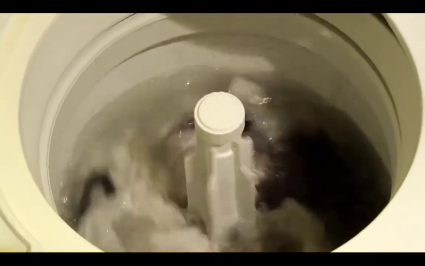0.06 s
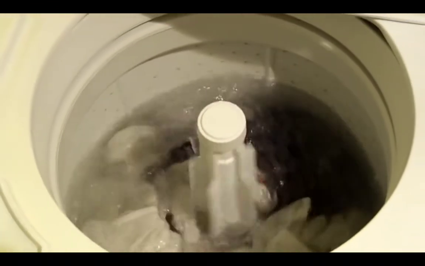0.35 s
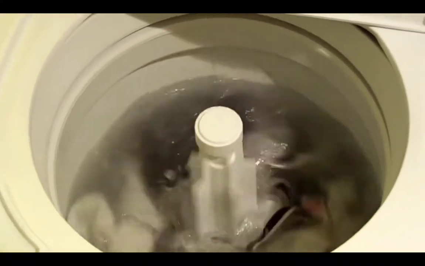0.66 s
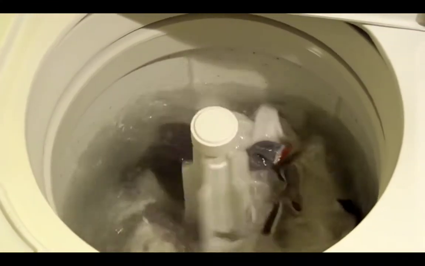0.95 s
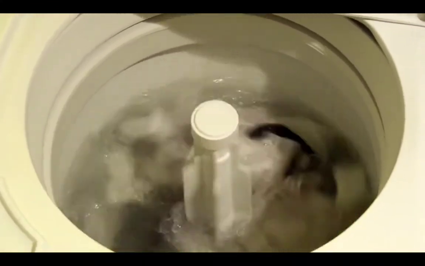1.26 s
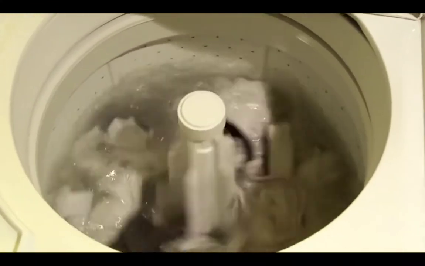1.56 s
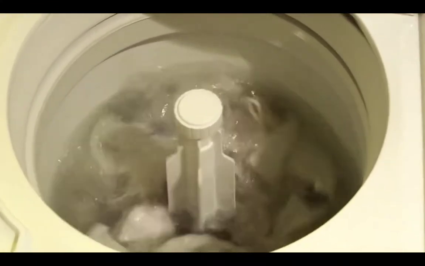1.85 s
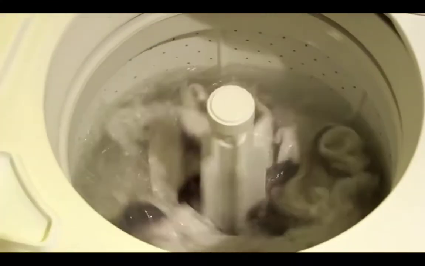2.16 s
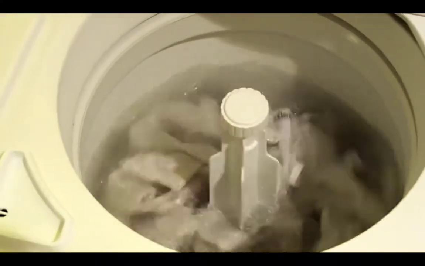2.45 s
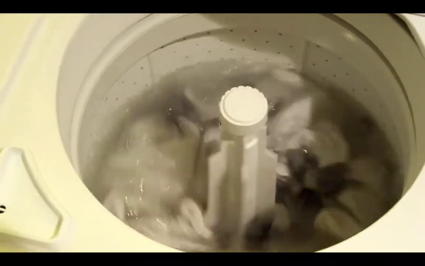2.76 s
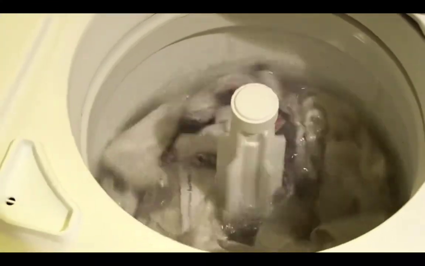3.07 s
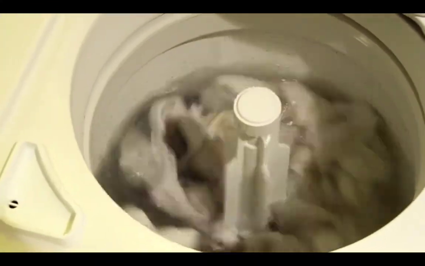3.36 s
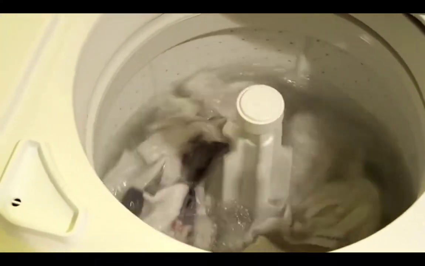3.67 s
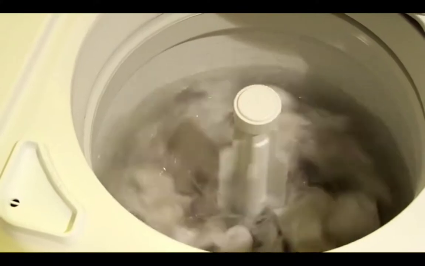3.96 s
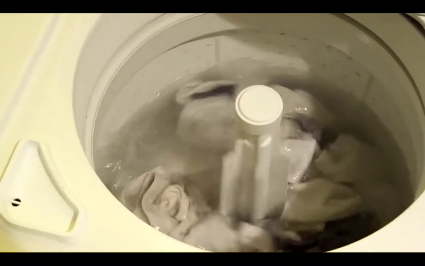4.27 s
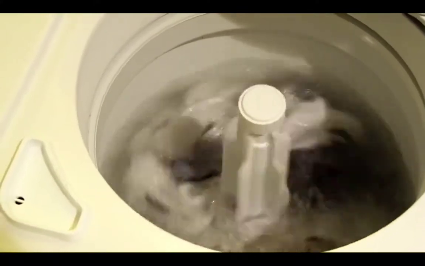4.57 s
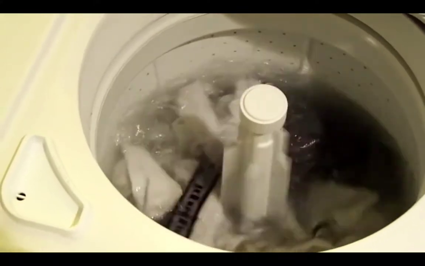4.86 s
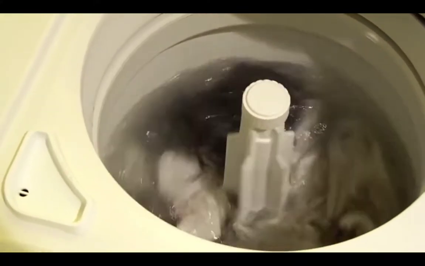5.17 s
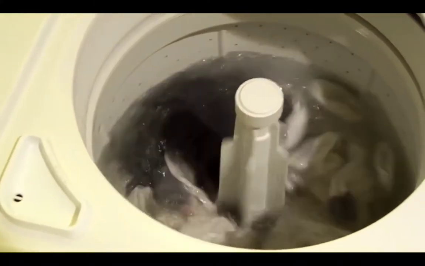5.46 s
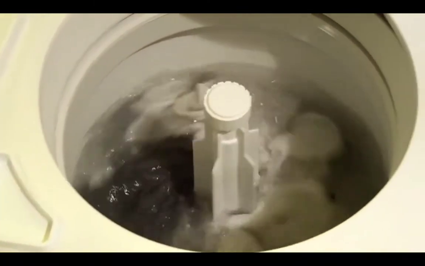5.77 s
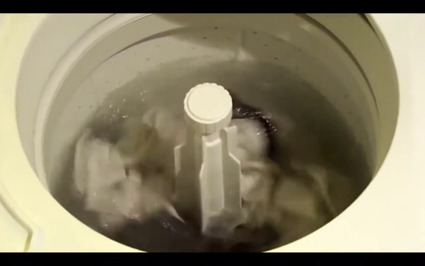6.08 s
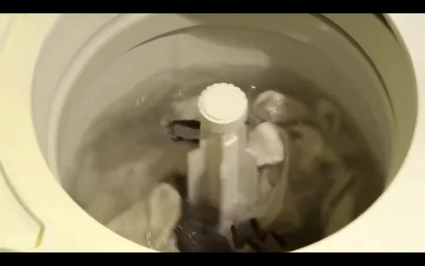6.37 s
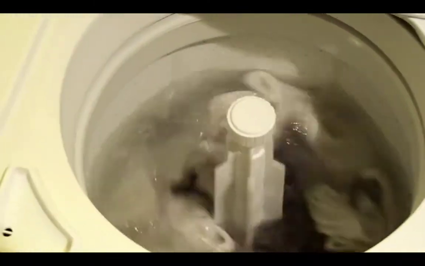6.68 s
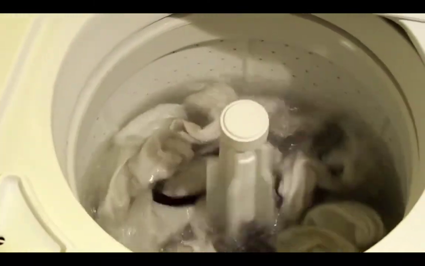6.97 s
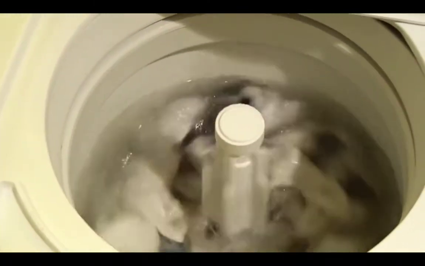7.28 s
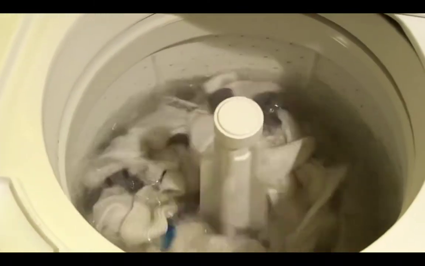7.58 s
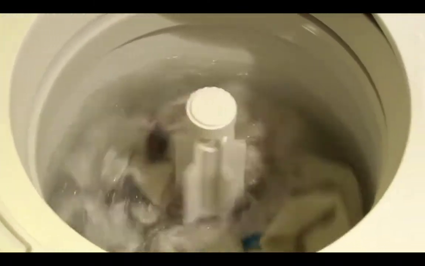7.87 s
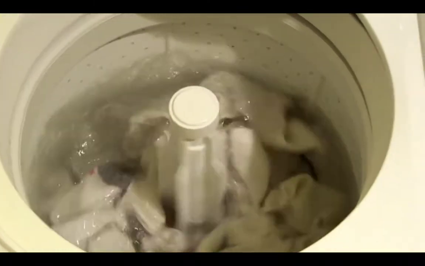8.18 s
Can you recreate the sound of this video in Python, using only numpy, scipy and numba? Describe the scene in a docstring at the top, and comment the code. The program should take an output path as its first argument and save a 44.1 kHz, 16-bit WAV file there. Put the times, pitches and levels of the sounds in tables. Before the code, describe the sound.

Rhythmic sloshing and splashing of laundry in a top-loading washer, with a humming, rumbling motor underneath.

```python
"""Water sloshes in steady strokes over a motor hum: a top-loading washer, heard from just above the open tub.
Each stroke of the agitator drags cloth through the water: a bubbling surge, a backwash, a fizz of spray.
Wet cloth slaps the surface, single drops ring as trapped bubbles, and the load knocks dully on the tub.
Underneath, the cabinet rumbles and the gearbox whines, its pitch sagging twice in every stroke."""
import sys
import numpy as np
from scipy import signal
from scipy.fft import rfft, irfft
from scipy.io import wavfile
from scipy.ndimage import uniform_filter1d
from numba import njit

SR = 44100
rng = np.random.default_rng(int(sys.argv[2]) if len(sys.argv) > 2 else 0)


def transcribe(signal):
    """Save signal, clipped to [-1, 1], as a 16-bit WAV file at the path in sys.argv[1]."""
    frames = np.atleast_2d(signal).T
    limited = np.clip(frames, -1, 1)
    pcm = np.round(limited * 32767).astype(np.int16)
    wavfile.write(sys.argv[1], SR, pcm)


N = 367353
STROKE_S = .5515  # the beat of the agitator


def undb(db):
    """Decibels to gain."""
    return 10 ** (np.asarray(db) / 20)


def unit(x):
    """Scale to rms 1."""
    return x / np.sqrt(np.mean(x ** 2))


def envelope(points):
    """Straight ramps through (time_s, value) points, one value a sample."""
    return np.interp(np.arange(N) / SR, *np.transpose(points))


def eq_curve(points):
    """Gain at every frequency from (freq_hz, gain_db) points."""
    hz, db = np.transpose(points)
    bin_hz = np.arange(N // 2 + 1) * SR / N
    return undb(np.interp(np.log(bin_hz + 1), np.log(hz), db))


def eq(x, points):
    """Filter with an EQ curve."""
    return irfft(rfft(x) * eq_curve(points), N)


def band(x, points):
    """EQ that falls steeply beyond its ends; rms 1."""
    return unit(eq(x, [(points[0][0] / 2, -60), *points, (points[-1][0] * 2, -60)]))


def noise():
    """Two unrelated noises, for mid and side."""
    return rng.standard_normal((2, N))


def drift(rate_hz):
    """A smooth random modulator: held steps, slewed twice; rms 1."""
    hold = max(int(SR / rate_hz), 1)
    steps = np.repeat(rng.standard_normal(N // hold + 1), hold)
    return unit(uniform_filter1d(uniform_filter1d(steps, hold), hold)[:N])


def tone(hz):
    """A sine of rms 1 on a moving pitch."""
    return np.sqrt(2) * np.sin(2 * np.pi * np.cumsum(hz) / SR)


def swell(centre_s, width_s):
    """A smooth bump of height 1."""
    return np.exp(-.5 * ((np.arange(N) / SR - centre_s) / width_s) ** 2)


def stroke_lfo(peak_s):
    """A cosine that peaks once a stroke."""
    return np.cos(2 * np.pi * (np.arange(N) / SR - peak_s) / STROKE_S)


def drum_reverb(dry, t60_s, wet_db):
    """The steel drum smears each sound with dense short echoes."""
    t = np.arange(SR // 4) / SR
    tails = rng.standard_normal((2, 2, len(t))) * undb(-60 * t / t60_s) * (t > .002)
    tails /= np.sqrt(np.sum(tails ** 2, axis=(1, 2), keepdims=True))
    echoes = signal.fftconvolve(dry[None], tails, axes=2).sum(axis=1)[:, :N]
    return (dry + undb(wet_db) * echoes) / np.hypot(1, undb(wet_db))


# tone colour of the cabinet rumble: freq_hz, gain_db
RUMBLE_EQ = [(20, -3), (60, 0), (100, -5), (270, -4.5), (490, 2.5), (680, -4.5), (950, -1), (1300, -10),
             (2000, -11.5), (3000, -25), (6500, -26.5), (8000, -38)]
# ringing cabinet panels: pitch_hz, bandwidth_hz, level_db
PANEL_MODES = [(124.4, 25, -23.5), (180.5, 36, -30.5), (361.2, 39, -27.5), (440, 63, -28),
               (848, 110, -31.5), (1042, 58, -33.5)]
def cabinet(rumble_db=-23, flicker_db=1):
    """The drive and the moving water shake the cabinet: a broad rumble and a few ringing panels."""
    bed = undb(rumble_db + flicker_db * drift(14)) * band(noise(), RUMBLE_EQ)
    for hz, width_hz, db in PANEL_MODES:
        b, a = signal.iirpeak(hz, hz / width_hz / 2, fs=SR)
        bed += undb(db) * unit(signal.lfilter(b, a, signal.lfilter(b, a, noise())))
    return bed


# drone of the belt and pulleys: pitch_hz, level_db
BELT_TONES = [(90, -36.5), (185, -35.5)]
def belt():
    """The belt and pulleys add faint steady tones."""
    return sum(undb(db) * tone(np.full(N, hz)) for hz, db in BELT_TONES)


# slow fader ride on the hum: time_s, level_db
HUM_RIDE = [(0, -19), (.17, -13), (.32, -24.5), (.7, -18), (1.1, -16.5), (2.0, -19), (3.2, -18),
            (4.1, -17.5), (4.9, -22.5), (5.4, -19.5), (5.9, -19), (6.4, -17.5), (7.1, -20), (7.55, -14.5),
            (8.33, -18)]
def motor(mains_hz=60, trim_db=-1.5, dip_delay_s=.035, dip_width_s=.038, rebound=.27, rebound_delay_s=.16):
    """The motor hums at twice the mains rate, ducking as each stroke takes up the load, then rebounding."""
    level_db = envelope(HUM_RIDE) + trim_db + .6 * drift(16)
    for start_s, *_, dip_db in AGITATOR_STROKES:
        level_db -= dip_db * swell(start_s + dip_delay_s, dip_width_s)
        level_db += dip_db * rebound * swell(start_s + rebound_delay_s, dip_width_s)
    pitch_hz = 2 * mains_hz + 2.002 * drift(14) + 6 * drift(90)  # slow waver, fast shudder
    return undb(level_db) * tone(pitch_hz)


# slow fader ride on the gear whine: time_s, level_db
WHINE_RIDE = [(0, -22.5), (.5, -24.5), (.9, -26.5), (1.15, -20.5), (1.65, -27), (2.0, -26.5), (2.7, -24.5),
              (3.3, -25.5), (3.95, -29), (4.2, -22.5), (5.2, -26.5), (6.3, -28), (7.0, -27), (7.35, -22),
              (8.33, -26)]
def gearbox(mesh_hz=433.7, octave_db=-27.5, sag=.02, flutter=.009, chatter=.012, wander_db=2, slack_db=4):
    """Gear teeth sing unevenly; the drive slows under load, and the octave fades at each reversal."""
    load = stroke_lfo(peak_s=.228) ** 4  # the even power makes two sags a stroke
    reversal = np.maximum(stroke_lfo(peak_s=.53), 0) ** 4
    pitch_hz = mesh_hz * (1 - sag * load + flutter * drift(45) + chatter * drift(160))
    whine = undb(envelope(WHINE_RIDE) + wander_db * drift(18)) * tone(pitch_hz)
    octave = undb(octave_db - slack_db * reversal + wander_db * drift(16)) * tone(2 * pitch_hz)
    return whine + octave


# resonances of the tub: pitch_hz, level_db, t60_s
TUB_MODES = [(212, 1, .12), (329, 1, 0.059), (640, 1, 0.073), (755, 4.5, 0.03), (906, 3, 0.061),
             (1260, -3, 0.022)]
# the load bumping the tub: start_s, level_db
KNOCK_CUES = [(1.2092, -3.5), (4.268, -16.5), (5.675, -10)]
def knocks(trim_db=-7):
    """The heavy load bumps the tub, whose modes the water damps quickly."""
    t = np.arange(SR // 4) / SR
    thud = sum((-1) ** k * undb(db - 60 * t / t60_s) * np.sin(2 * np.pi * hz * t)
               for k, (hz, db, t60_s) in enumerate(TUB_MODES))
    hits = np.zeros(N)
    for start_s, db in KNOCK_CUES:
        hits[int(start_s * SR)] = undb(db + trim_db)
    return signal.fftconvolve(hits, thud)[:N]


@njit
def bubble_pings(start_sample, hz, cycles, gains, glide):
    """Each bubble rings as a decaying, rising sine, with its own gain in mid and side."""
    out = np.zeros((2, N))
    for k in range(len(start_sample)):
        start, length = int(start_sample[k]), int(cycles[k] * SR / hz[k]) + 1
        fade = np.exp(-5.8 / length)  # 50 dB down by the end
        phase, level = 0., 1.
        for i in range(min(length, N - start)):
            phase += 2 * np.pi * hz[k] * (1 + glide * i / length) / SR
            level *= fade
            ping = level * np.sin(phase)
            out[0, start + i] += gains[k, 0] * ping
            out[1, start + i] += gains[k, 1] * ping
    return out


# plinks of single drops: start_s, level_db, pitch_hz
DROP_CUES = [(0.262, -20, 3500), (0.309, -16, 3740), (0.64, -10, 2590), (0.946, -15.5, 3780),
             (1.691, -15, 5660), (2.5656, -16, 5800), (3.1288, -21, 5900), (4.8209, -20, 3220),
             (5.0577, -17, 6080), (5.251, -9.5, 5930), (5.598, -12, 5760), (5.8775, -18, 6000),
             (6.1414, -12, 5900), (6.6204, -25, 5800)]
def drops(trim_db=1, cycles=50., glide=.044, spread=.74):
    """Each drop traps a bubble that rings briefly and rises in pitch as it nears the surface."""
    start_s, db, hz = np.transpose(DROP_CUES)
    gain = undb(db + trim_db)
    mid_side = np.column_stack([gain, gain * spread * rng.uniform(-1, 1, len(hz))])
    plinks = bubble_pings(start_s * SR, hz.copy(), np.full(len(hz), cycles), mid_side, glide)
    return drum_reverb(plinks, t60_s=.083, wet_db=-1.5)


# wet cloth slapping the surface: start_s, level_db, burst_offset_db
SPLAT_CUES = [(0.0503, -20.5, 15), (0.094, -9.5, 0), (0.3467, -13.5, -4), (0.641, -19.5, 4),
              (0.819, -9, -3), (1.142, -11, -2), (1.211, -6, -5), (1.2255, -25, 4), (1.7873, -5, -6),
              (1.8734, -11.5, -5), (2.285, -11, -2), (2.3354, -10, 5.5), (2.748, -8, 0), (2.94, -20, 9),
              (3.05, -14, 4), (3.394, -12, -11), (3.5623, -8, -6), (3.9428, -8.5, -2), (3.959, -6, 0),
              (3.9902, -5, -5), (4.4804, 3, -13), (4.4904, -2.5, -7), (5.062, -18, 11), (5.1094, -11, 5.5),
              (5.2978, -12, -19), (5.6, -11.5, 1), (5.6724, -16, -3), (6.1414, -11, -5), (6.342, -13, 9.5),
              (6.6747, -7.5, -4), (6.7604, -18, -9), (6.9217, -17, 5), (7.4819, -15, -3), (7.7965, -6, -3),
              (7.876, -14, -8), (7.9766, -14, -11)]
def splats(crack_db=-2, burst_db=-8, attack_s=.0011, crack_decay_s=.0018, burst_decay_s=.008):
    """Cloth lands with a wet crack, then the duller burst of the water that it throws aside."""
    t = np.arange(N) / SR
    crack, burst = np.zeros(N), np.zeros(N)
    for start_s, db, offset_db in SPLAT_CUES:
        i = int(start_s * SR)
        age = t[:min(SR // 10, N - i)]
        onset = undb(db) * (1 - np.exp(-age / attack_s))
        crack[i:i + len(age)] += onset * undb(crack_db) * np.exp(-age / crack_decay_s)
        burst[i:i + len(age)] += onset * undb(burst_db + offset_db) * np.exp(-age / burst_decay_s)
    slaps = crack * band(noise(), SPRAY_EQ) + burst * band(noise(), SLOSH_EQ)
    return drum_reverb(slaps, t60_s=.14, wet_db=-12)


def bubble_cloud(low_hz, high_hz, cycles, scatter_db, glide, count):
    """Bubbles of all sizes: many faint, a few loud, each from its own place in the tub."""
    when, pitch, life, loudness, place = rng.random((count, 5)).T
    hz = low_hz * (high_hz / low_hz) ** pitch
    gain = hz * undb(-scatter_db * np.log(.02 + .98 * loudness))
    mid_side = np.column_stack([gain, gain * np.sqrt(2) * np.cos(2 * np.pi * place)])
    return unit(bubble_pings(when * N, hz, cycles * (.5 + life), mid_side, glide))


# strokes of the agitator: start_s, length_s, drag_db, surge_delay_s, surge_db,
# backwash_delay_s, backwash_db, spray_offset_db, hum_dip_db
AGITATOR_STROKES = [(0.028, .37, -26.5, .075, -18, .245, -25.5, -0.5, 5),
                    (0.589, .26, -28, 0.061, -18, .235, -28.5, 0.5, 5),
                    (1.14, 0.27, -25, 0.082, -18, .205, -25, -2, 4),
                    (1.696, 0.24, -26, .045, -26, .18, -22.5, -0.5, 1),
                    (2.256, 0.28, -29, .092, -22.5, .21, -30.5, 1, 11),
                    (2.746, .345, -27.5, 0.11, -33.5, .202, -22.5, -0.5, 2),
                    (3.389, .26, -28.5, .058, -23, .208, -17.5, 0, 10),
                    (3.902, 0.31, -27, 0.042, -25, .24, -21.5, 1, 8),
                    (4.441, 0.28, -25.5, .055, -23, 0.3, -28.5, -1.5, 12),
                    (5.043, 0.25, -30, 0.079, -20.5, .20, -26.5, 1, 3.5),
                    (5.584, 0.26, -29, 0.033, -20, 0.17, -29, 1, 5),
                    (6.125, .26, -28, 0.1, -23, .218, -23.5, 0, 7),
                    (6.663, 0.28, -28, 0.099, -15.5, .272, -22.5, 0.5, 8),
                    (7.234, 0.26, -25, 0.098, -22.5, 0.28, -28.5, 0.5, 2),
                    (7.742, 0.28, -24.5, .066, -19, .13, -25, 0.5, 1)]
def agitation(calm_db, swing_db, crest_db, fade_db_per_s, attack_s=.025, release_s=.04):
    """Level of the surface in dB: the blades drag the load, a surge breaks, then the backwash."""
    t = np.arange(N) / SR
    power = undb(calm_db - swing_db * stroke_lfo(peak_s=.3)) ** 2
    for start, length, drag_db, surge_s, surge_db, back_s, back_db, _, _ in AGITATOR_STROKES:
        age = t - start
        gate = np.clip(age / attack_s, 0, 1) * np.exp(-np.maximum(age - length, 0) / release_s)
        power += (undb(drag_db - fade_db_per_s * np.clip(age, 0, length)) * gate) ** 2
        power += (undb(surge_db + crest_db) * swell(start + surge_s, width_s=.016)) ** 2
        power += (undb(back_db + crest_db) * swell(start + back_s, width_s=.013)) ** 2
    return 10 * np.log10(power)


# tone colours of the deep churn, the midrange slosh and the bright spray: freq_hz, gain_db
CHURN_EQ = [(70, -10.5), (150, -13), (220, -1), (320, -5), (520, -10), (900, -21)]
SLOSH_EQ = [(400, -4), (700, 0), (1200, 2), (2000, 0.5), (2700, -6), (4000, -17.5)]
SPRAY_EQ = [(1800, -16), (3000, 4.5), (4500, 2.5), (6200, 3.5), (7300, -1), (8000, -15)]
def water(churn_db=-27, churn_follow=.22, slosh_db=-.5, spray_db=-6, wash_db=-4.5, hiss_db=-5):
    """Big air pockets churn below, bubbles gurgle at the surface, and fine spray crackles on top."""
    ripple = drift(45)
    surface_db = agitation(calm_db=-34, swing_db=2, crest_db=-1, fade_db_per_s=4.5) + 1.3 * ripple
    fizz_db = agitation(calm_db=-36, swing_db=3.5, crest_db=-5, fade_db_per_s=3) + 1.45 * ripple
    fizz_db += envelope([(start + length / 2, db) for start, length, *_, db, _ in AGITATOR_STROKES])
    pockets = bubble_cloud(108., 725, cycles=5.8, scatter_db=1.5, glide=.11, count=2400)
    gurgle = bubble_cloud(444, 3900, cycles=25, scatter_db=3, glide=.28, count=8000)
    crackle = bubble_cloud(2000, 8500, cycles=39, scatter_db=3.5, glide=.1, count=16000)
    # the deep water keeps moving between strokes, so it swells far less than the surface
    churn = undb(churn_db + churn_follow * (surface_db - surface_db.mean())) * band(pockets, CHURN_EQ)
    slosh = undb(surface_db + slosh_db) * band(gurgle + undb(wash_db) * noise(), SLOSH_EQ)
    spray = undb(fizz_db + spray_db) * band(crackle + undb(hiss_db) * noise(), SPRAY_EQ)
    return churn + drum_reverb(slosh + spray, t60_s=.07, wet_db=-5)


# stereo width: freq_hz, side_gain_db
STEREO_WIDTH = [(60, -33), (250, -25.5), (500, -14), (1000, -7), (2000, -3.5), (4000, -1.5), (7000, -2)]
# stereo balance: freq_hz, left_minus_right_db
STEREO_BALANCE = [(60, 2), (250, 2), (500, 0.5), (1000, 1.5), (2000, -2.5), (4000, -3.5), (7000, -7.5)]
def scene():
    """The mix: the bass is nearly mono; the bright splashing is wide and leans to the right."""
    mid, side = cabinet() + water() + splats() + drops()
    mid = mid + motor() + belt() + gearbox() + knocks()
    side = eq(side, STEREO_WIDTH)
    lean = eq_curve(STEREO_BALANCE)
    pan = np.array([2 * lean, np.full_like(lean, 2)]) / (1 + lean)
    return irfft(rfft(np.array([mid + side, mid - side])) * pan, N)


def record(dry, target_db=-13.5, squeeze=.28, window_s=.014, ceiling=.76, top_hz=8000):
    """Fast gain control evens the level, the rare peaks are rounded, the top is cut steeply."""
    power = uniform_filter1d(np.mean(dry ** 2, axis=0), int(window_s * SR))
    even = dry * (undb(target_db) / np.sqrt(power)) ** squeeze
    rounded = even / (1 + (even / ceiling) ** 8) ** (1 / 8)
    return signal.sosfilt(signal.ellip(10, .3, 80, top_hz, fs=SR, output="sos"), rounded)


dry = scene()
out = record(dry)
transcribe(out)
```